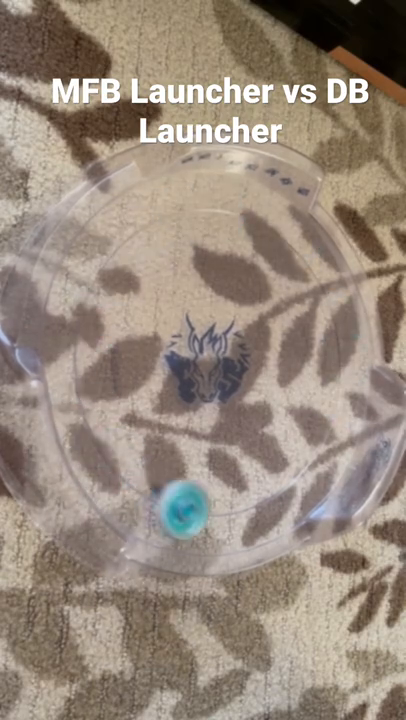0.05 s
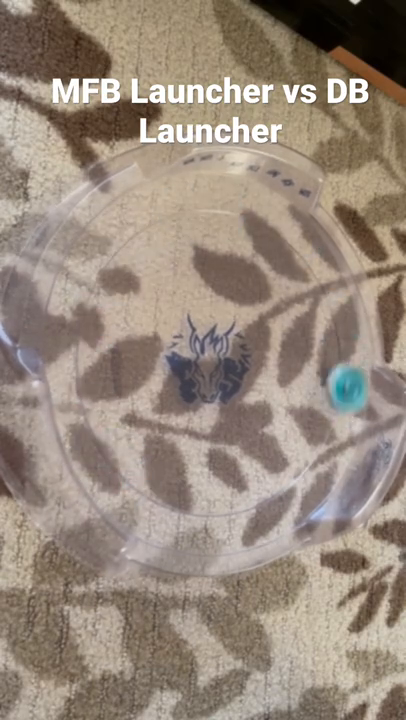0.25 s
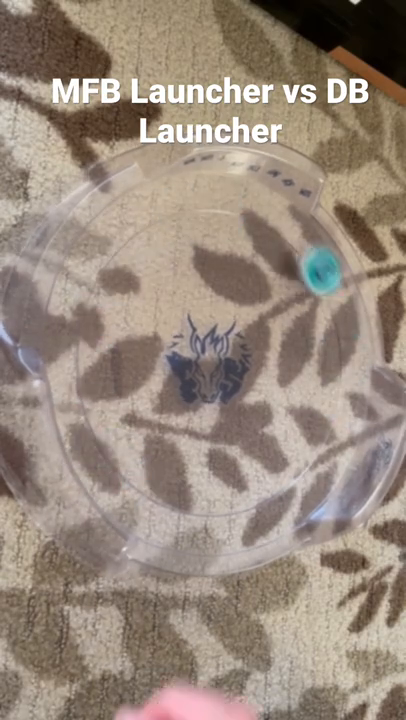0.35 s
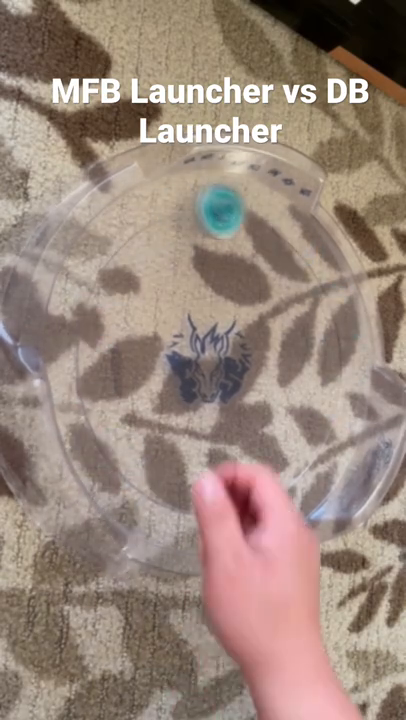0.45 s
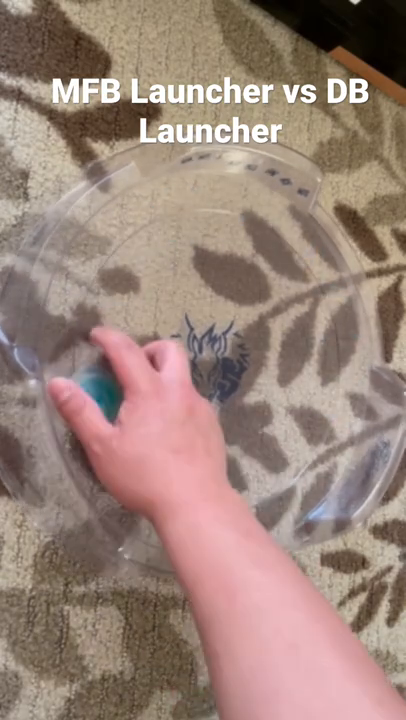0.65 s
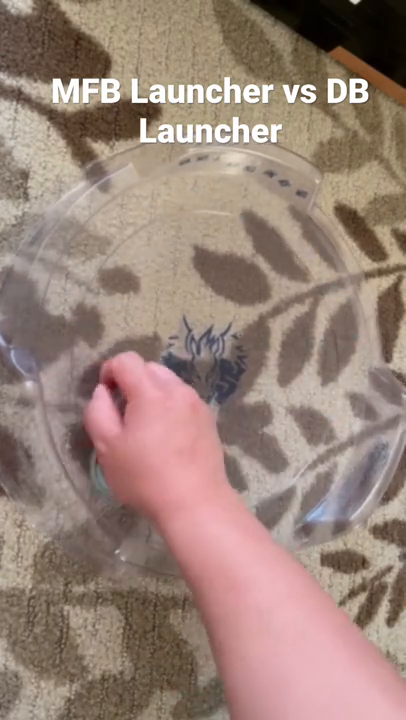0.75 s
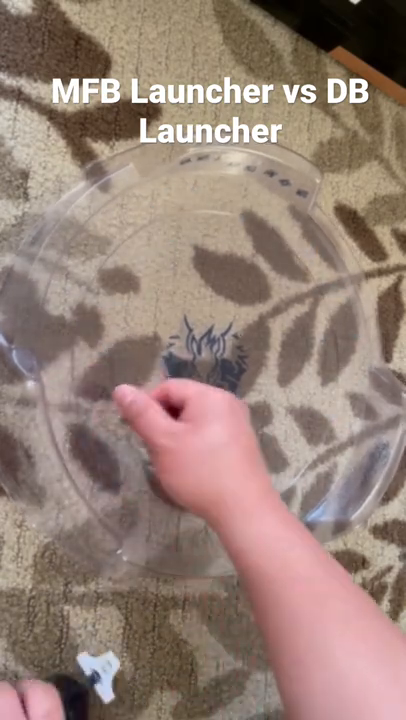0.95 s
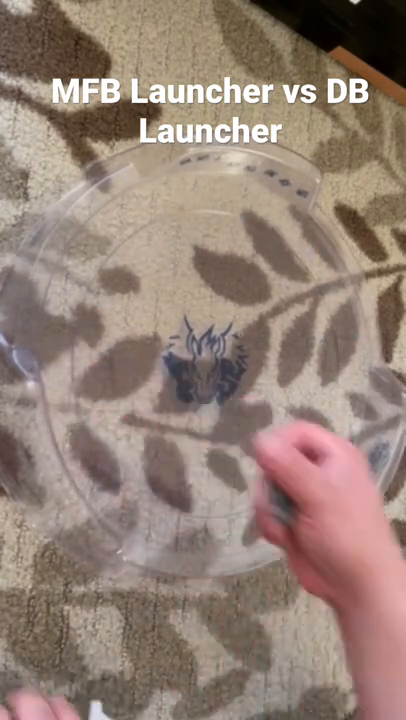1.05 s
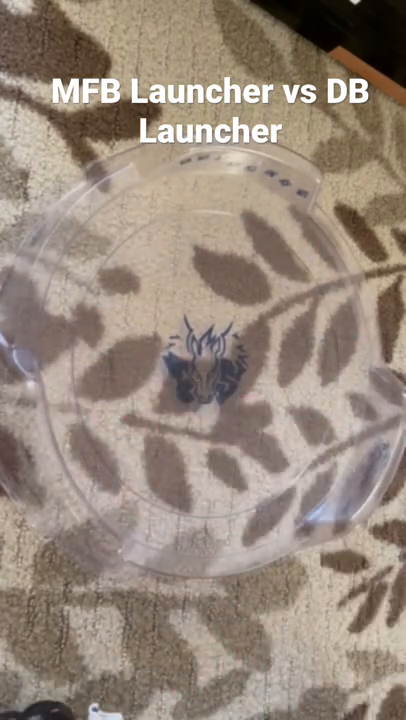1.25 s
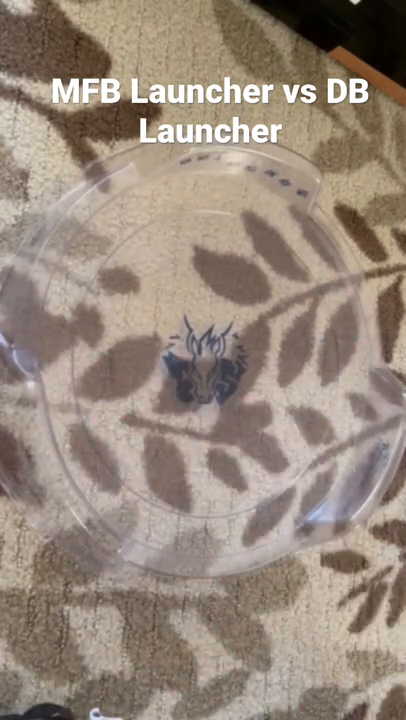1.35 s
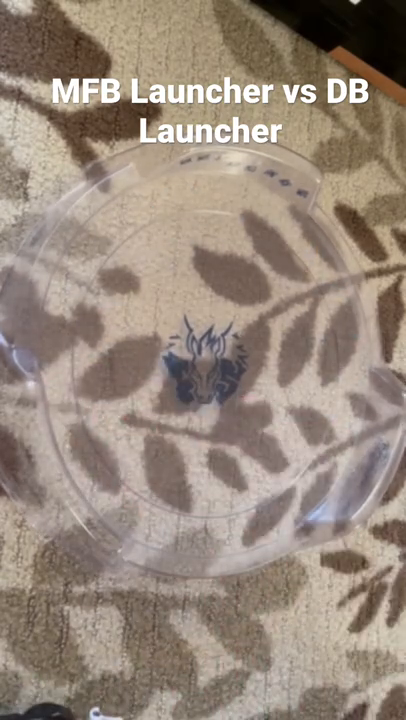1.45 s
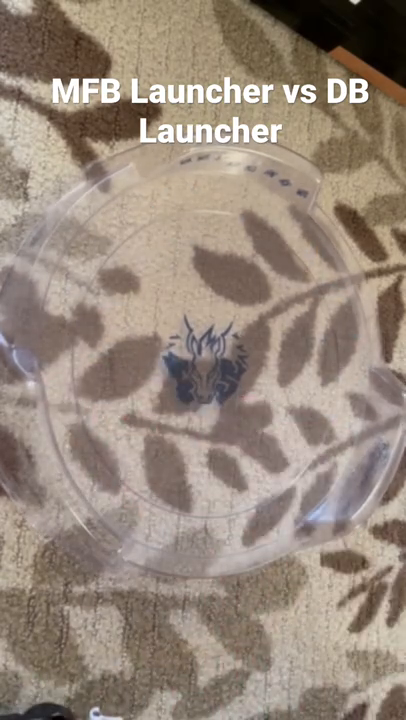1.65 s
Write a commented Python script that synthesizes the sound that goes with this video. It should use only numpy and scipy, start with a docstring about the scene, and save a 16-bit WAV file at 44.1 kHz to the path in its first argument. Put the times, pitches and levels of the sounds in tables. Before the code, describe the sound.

A toy top rumbles and ticks around a thin plastic arena, scrapes against grabbing fingers and clatters to a stop. Its loose parts click faintly afterward, heard close up in a small room with a low hum.

```python
"""A small room with a low hum, heard in stereo close to a thin plastic arena on a carpet.
A toy top circles the bowl: its tip rumbles and ticks as it wobbles, and one knock stands out.
A hand closes on it: the rim scrapes against the fingers, then the top clatters on the bowl and stops.
Its loose parts click faintly as it is carried off."""
import sys
import numpy as np
from scipy import signal
from scipy.fft import rfft, irfft, next_fast_len
from scipy.io import wavfile
from scipy.ndimage import uniform_filter1d, map_coordinates

SR = 44100
rng = np.random.default_rng(int(sys.argv[2]) if len(sys.argv) > 2 else 0)


def store_wav(level_fs):
    """Save 16-bit WAV to argv[1]."""
    pcm = np.round(np.clip(np.atleast_2d(level_fs), -1, 1) * 32767)
    wavfile.write(sys.argv[1], SR, pcm.T.astype(np.int16))


N = 74970
T = np.arange(N) / SR

# Appliance hum. Each row: frequency in Hz, rms level in dB.
HUM_TONES = [(58.6, -38), (122, -50)]

# Noise spectra. Each row: frequency in Hz, relative level in dB.
AIR_COLOUR = [(25, -32), (45, -6.5), (135, -0.5), (200, -5.5), (280, -16), (520, -13.5), (700, -18.5),
              (1150, -22), (1700, -29.5), (2400, -30), (3800, -39.5), (7000, -41.5), (11800, -44),
              (13000, -109)]
SNAP_COLOUR = [(2500, -1), (6500, -9), (9000, 6), (11400, 6), (12800, -32), (14000, -45)]  # bright edge of a click
HOLLOW_COLOUR = [(600, -22), (1100, 13), (1900, -3), (2500, 2), (3300, -4), (4100, -1.5), (7500, -5),
                 (13000, -35)]  # the top's body under a click
RUB_COLOUR = [(300, 9.5), (1200, 3.5), (3400, -0.5), (4200, 3.5), (5200, -4), (9000, -3), (11800, 1.5),
              (13200, -24), (16000, -27)]  # top against fingers
DRONE_COLOUR = [(45, -30), (75, -3), (130, -8), (200, -1), (290, 1), (380, 2), (480, -6.5), (620, -13),
                (1000, -65)]  # bowl under the rolling tip
GRIT_COLOUR = [(300, -26), (600, -7), (850, -14.5), (1250, -8.5), (2200, -13.5), (3800, -13), (7000, -23.5),
               (11800, -26), (13200, -50)]
SCUFF_COLOUR = [(300, 1.5), (700, 13.5), (1400, 6), (2200, -1), (3600, 4), (6200, -4), (7200, -10),
                (9200, -2), (12100, -5.5), (13400, -51)]  # a skip of the tip
SHELL_COLOUR = [(40, -23), (150, -5), (350, 3.5), (500, -4.5), (1250, -4.5), (1900, -3.5), (2150, -8),
                (2450, -5), (3050, -12), (3450, -24), (8000, -61)]  # the arena's dense overtones
CRACK_COLOUR = [(500, -31), (1200, 11.5), (2500, 1.5), (4200, 3), (7000, -1), (9200, 2.5), (11800, 1),
                (13200, -20), (15500, -26)]  # sharp edge of a knock

# Modes of arena, top and loose parts. Each row: frequency in Hz, relative level in dB.
BOWL_MODES = [(584, -4), (666, -6), (729, -6), (1160, 0), (1227, -4), (1367, -1), (1474, -5), (1657, -4),
              (1801, -4)]
TOP_MODES = [(3760, 6), (5680, 5)]
PART_MODES = [(1070, 3.5), (1350, -0.5), (2370, 4.5), (2595, 1.5), (3900, -4)]

# Loose parts click in the hand. Each row: time in seconds, snap level in dB, body level in dB.
PART_CLICKS = [(0.9702, -32, -28.5), (.974, -43, -35.5), (0.9878, -45, -37.5), (1.015, -52, -41),
               (1.0389, -33.5, -59), (1.046, -42, -39), (1.297, -45.5, -61), (1.5657, -46.5, -60),
               (1.5842, -47, -56), (1.6711, -48, -40.5)]
# Soft bumps of the hand. Each row: start in seconds, pitch in Hz, T60 in seconds, level in dB.
HAND_BUMPS = [(0.742, 112, 0.12, -22), (1.043, 178, 0.023, -26)]
# Faint handling, and the rim on the fingers. Each row: time in seconds, level in dB.
HAND_RUSTLE = [(1.28, -69), (1.30, -56), (1.36, -53.5), (1.42, -66), (1.55, -62), (1.568, -45.5),
               (1.60, -76)]
RIM_SCRAPE = [(.645, -41), (.662, -32), (.69, -34), (.70, -32), (.708, -35), (.718, -26), (.738, -30),
              (.765, -49), (.795, -36.5), (.805, -70)]
# The bowl under the rolling tip. Each row: time in seconds, drone level in dB, relative midrange in dB.
ROLL_LEVELS = [(0, -37.5, -39.5), (.14, -41.5, -44), (.22, -30.5, -38), (.33, -32, -37.5),
               (.42, -33.5, -38), (.50, -37.5, -41.5), (.55, -42, -38.5), (.595, -35, -33.5),
               (.64, -34, -44.5), (.71, -32, -49)]
# Resonance under the moving tip. Each row: time in seconds, pitch in Hz.
PANEL_PITCH = [(0, 797.3), (.26, 880), (.33, 1060), (.40, 850), (.50, 750.3), (.53, 1080), (.61, 1156)]
# A higher one climbs as the top circles. Each row: time in seconds, pitch in Hz, level in dB.
HIGH_PANEL = [(.10, 1100, -53.5), (.27, 1330, -45), (.39, 1415, -63), (.46, 1537, -47), (.53, 1660, -64)]
# The tip skips on the plastic. Each row: start in seconds, relative level in dB.
TIP_SKIPS = [(0.024, -34), (0.0364, -31.5), (0.063, -33.5), (0.074, -31.5), (0.128, -32), (0.14, -31),
             (.160, -29), (0.168, -37), (0.19, -28.5), (0.218, -30), (0.225, -33), (0.25, -31),
             (0.255, -36), (0.2637, -46), (0.2831, -24.5), (0.304, -30), (0.311, -31), (0.3315, -32.5),
             (0.35, -33.5), (0.374, -31), (0.3877, -29.5), (0.4278, -26.5), (0.4567, -25), (0.4869, -25),
             (0.5066, -28.5), (0.5344, -28), (0.5624, -29.5), (0.5745, -33), (0.602, -30.5)]
# The top strikes the bowl.
# Each row: start in seconds, relative level in dB, contact bandwidth in Hz, crack level in dB.
BOWL_KNOCKS = [(.102, -36.5, 900, -27), (0.41, -31.5, 895, -28.5), (0.614, -18, 540, -19),
               (.7245, -18, 950, -28), (0.7405, -8, 3500, -11), (.7464, -11, 2200, -14.5),
               (0.7536, -13, 2530, -17), (0.7674, -19, 1780, -29), (0.7743, -17, 1460, -27.5),
               (0.7862, -19, 795, -28), (.7945, -19, 377, -58)]
# The bowl's lowest mode sinks as the hand bears down. Each row: time in seconds, pitch in Hz.
THUD_PITCH = [(.72, 386.7), (.75, 347), (.775, 295.4), (.82, 274)]

# Diffuse sound at the microphone. Each row: frequency in Hz, left-right likeness from 0 to 1.
LIKENESS = [(100, .99), (350, .95), (700, .6), (1200, .85), (4500, .6), (9000, .85)]
# Left-right phase by frequency; the sides turn opposite near 10 kHz, hollowing the treble in mono.
# Each row: frequency in Hz, lead of the left in radians.
STEREO_PHASE = [(500, 0), (850, -.4), (1300, 0), (3000, .55), (7000, .2), (7800, .6), (8900, 0),
                (10300, -3.1), (11900, -6.25)]
# Left-right balance. Each row: frequency in Hz, left minus right in dB.
STEREO_BALANCE = [(450, 0), (720, 4.5), (1200, -1.5), (2200, 1), (5000, 1.5), (6500, 0)]

BOWL_T60_S, TOP_T60_S, PARTS_T60_S = .065, .055, .032
BAND_LIMIT_HZ = 15900


def amp(db):
    """Decibels to gain."""
    return 10 ** (np.asarray(db) / 20)


def unit(x):
    """Scale to rms 1."""
    return x / np.sqrt(np.mean(x ** 2) + 1e-20)


def along(points, hz):
    """Interpolate (Hz, value) points on a log axis."""
    freqs, values = np.transpose(points)
    return np.interp(np.log(hz + 1), np.log(freqs + 1), values)


def curves(rows):
    """One value per sample for each column after the time."""
    times, *columns = np.transpose(rows)
    return [np.interp(T, times, column) for column in columns]


def wobble(rate):
    """A smooth random curve, rate knots a second."""
    return map_coordinates(rng.standard_normal(int(N * rate / SR) + 4), [T * rate])


def filtered(x, response):
    """Filter x by a complex response of frequency."""
    size = next_fast_len(N + SR // 8, True)
    return irfft(rfft(x, size) * response(np.fft.rfftfreq(size, 1 / SR)), size)[..., :N]


def spread(pair, side_db=0):
    """Two unrelated signals become left and right, alike in the bass."""
    def weights(hz):
        angle = np.arccos(np.clip(along(LIKENESS, hz), -1, 1)) / 2
        return np.array([np.cos(angle), amp(side_db) * np.sin(angle)])
    mid, side = filtered(pair, weights)
    return np.array([mid + side, mid - side])


def noise(colour, side_db=2):
    """Stereo noise of rms 1 with the given spectrum."""
    pair = filtered(rng.standard_normal((2, N)), lambda hz: amp(along(colour, hz)))
    return unit(spread(pair, side_db))


def patchy(x, depth_db=3):
    """The colour of x shifts in small random patches of time and pitch."""
    spectrum = signal.stft(x, nperseg=256)[2]
    patches = uniform_filter1d(rng.standard_normal(spectrum.shape[1:]), size=4, axis=0)
    patches = unit(uniform_filter1d(patches, size=7, axis=1))
    return unit(signal.istft(spectrum * amp(depth_db * patches), nperseg=256)[1][:, :N])


def burst(s, rise, t60):
    """Envelope of one contact: a quick swell up to time s, then a decay; all in seconds."""
    return np.exp(np.minimum(T - s, 0) / rise - np.log(1000) * np.maximum(T - s, 0) / t60)


def softened(hz, contact_hz):
    """Gain in dB of a soft contact, falling above its bandwidth."""
    return -10 * np.log10(1 + (hz / contact_hz) ** 4)


def ring(modes, t60, s, contact_hz=BAND_LIMIT_HZ):
    """Modes struck at time s; no two blows weigh them alike."""
    hz, db = np.transpose(modes)[:, :, None]
    start = int(s * SR)
    t = np.maximum(T[start:start + SR // 7] - s, 0)
    signs = (-1) ** np.arange(len(hz))[:, None]
    gain = signs * amp(db + softened(hz, contact_hz) + rng.standard_normal(hz.shape))
    tones = np.sum(gain * np.sin(2 * np.pi * hz * t), axis=0)
    out = np.zeros(N)
    out[start:start + len(t)] = tones * np.exp(-np.log(1000) * t / t60)
    return out / np.linalg.norm(gain)


def rubbed(hz, width_hz):
    """A resonance driven by friction: narrow noise of rms 1 around a steady or moving pitch."""
    drive = wobble(2 * width_hz) + 1j * wobble(2 * width_hz)
    phase = 2 * np.pi * np.cumsum(hz * np.ones(N)) / SR
    return unit(np.real(drive * np.exp(1j * phase)))


def room_tone(air_db=-39.5, waver_db=.5, drift_rad=.08):
    """A low appliance hum over the air of the room."""
    hum = 0
    for hz, db in HUM_TONES:
        peak = np.sqrt(2) * amp(db + waver_db * wobble(6.5))
        hum += peak * np.sin(2 * np.pi * hz * T + drift_rad * wobble(6.6))
    return hum + amp(air_db) * noise(AIR_COLOUR, side_db=7)


def room_tail(x, t60=.18):
    """The furnished room's short tail reaches the microphone from all sides."""
    tail = rng.standard_normal((2, SR // 2)) * np.exp(-np.log(1000) * T[:SR // 2] / t60)
    tail /= np.linalg.norm(tail[0])
    return spread(signal.fftconvolve(x.mean(axis=0)[None], tail, axes=1)[:, :N])


def handling():
    """The hand bumps the arena; the stopped top clicks and rustles in it."""
    snap = noise(SNAP_COLOUR)
    hollow = amp(-2) * noise(HOLLOW_COLOUR, side_db=7)
    clicks = 0
    for s, snap_db, body_db in PART_CLICKS:
        clicks += (amp(snap_db) * snap + amp(body_db) * hollow) * burst(s, rise=.00038, t60=.021)
        clicks += amp(body_db) * ring(PART_MODES, PARTS_T60_S, s)
    bumps = sum(amp(db) * ring([(hz, 0)], t60, s) for s, hz, t60, db in HAND_BUMPS)
    rustle = noise(RUB_COLOUR) * amp(curves(HAND_RUSTLE)[0])
    return clicks + bumps + rustle


def scraping(rough_db=4, squeak_db=-9):
    """The spinning rim rubs on the closing fingers and squeaks thinly as they press harder."""
    level_db, = curves(RIM_SCRAPE)
    squeak = amp(squeak_db + level_db - level_db.max()) * rubbed(hz=6950, width_hz=300)
    touching = (T > RIM_SCRAPE[0][0]) & (T < RIM_SCRAPE[-1][0])
    return (noise(RUB_COLOUR) + squeak) * amp(level_db + rough_db * wobble(300)) * touching


def rolling(rough_db=2, end_s=.701, release_s=.049):
    """The tip drives the bowl: a low drone, grit, and two resonances that shift as the top circles."""
    drone_db, mid_db = curves(ROLL_LEVELS)
    high_hz, high_db = curves(HIGH_PANEL)
    panels = amp(mid_db - 1) * rubbed(curves(PANEL_PITCH)[0], width_hz=160)
    panels += amp(high_db) * rubbed(high_hz, width_hz=160)
    grit = amp(mid_db - 6) * patchy(noise(GRIT_COLOUR))
    contact = amp(rough_db * wobble(170.2)) * np.clip((end_s - T) / release_s + 1, 0, 1)
    drone = amp(drone_db) * noise(DRONE_COLOUR)
    return contact * (drone + grit + panels)


def ticking(bite_s=.0011, grain_db=3.2, scuff_db=1.5, top_db=-8.5, bowl_db=-17):
    """Each skip of the tip is a short, grainy scuff that rings the top and the bowl."""
    grains = unit(patchy(noise(SCUFF_COLOUR)) * amp(grain_db * wobble(2200)))
    out = 0
    for s, db in TIP_SKIPS:
        out += amp(db + scuff_db) * grains * burst(s + bite_s, rise=.0013, t60=.027)
        out += amp(db + top_db) * ring(TOP_MODES, TOP_T60_S, s)
        out += amp(db + bowl_db) * ring(BOWL_MODES, BOWL_T60_S, s)
    return out


def knocking(rise_s=.00056, flex_s=.00097, shell_db=-1.5, bowl_db=-2.5, top_db=-24, thud_db=1.5):
    """Every blow cracks, flexes the thin shell, rings both bowl and top, and feeds the bowl's low thud."""
    crack = patchy(noise(CRACK_COLOUR))
    out = thud_energy = 0
    for s, db, contact_hz, crack_db in BOWL_KNOCKS:
        colour = [(hz, level + softened(hz, contact_hz)) for hz, level in SHELL_COLOUR]
        out += amp(crack_db) * crack * burst(s, rise_s, t60=.021)
        out += amp(db + shell_db) * noise(colour, side_db=-13) * burst(s + flex_s, rise_s, t60=.061)
        out += amp(db + bowl_db) * ring(BOWL_MODES, BOWL_T60_S, s, contact_hz)
        out += amp(crack_db + top_db) * ring(TOP_MODES, TOP_T60_S, s)
        thud_energy += (amp(db + thud_db) * burst(s + flex_s, rise_s, t60=.07)) ** 2
    thud_phase = 2 * np.pi * np.cumsum(curves(THUD_PITCH)[0]) / SR
    return out + np.sqrt(thud_energy) * np.sin(thud_phase)


def scene(tail_db=-12.5):
    """The top and the hand up close, the room faint behind them."""
    toy = rolling() + ticking() + knocking() + scraping() + handling()
    return toy + amp(tail_db) * room_tail(toy) + room_tone()


def record(dry, ceiling=.8):
    """Left and right differ in phase and level; peaks are rounded and the highest treble is cut."""
    sides = np.array([[.5], [-.5]])
    def left_right(hz):
        return amp(sides * along(STEREO_BALANCE, hz)) * np.exp(1j * sides * along(STEREO_PHASE, hz))
    x = filtered(dry, left_right)
    rounded = x / (1 + (x / ceiling) ** 6) ** (1 / 6)
    return filtered(rounded, lambda hz: hz < BAND_LIMIT_HZ)


dry = scene()
out = record(dry)
store_wav(out)
```